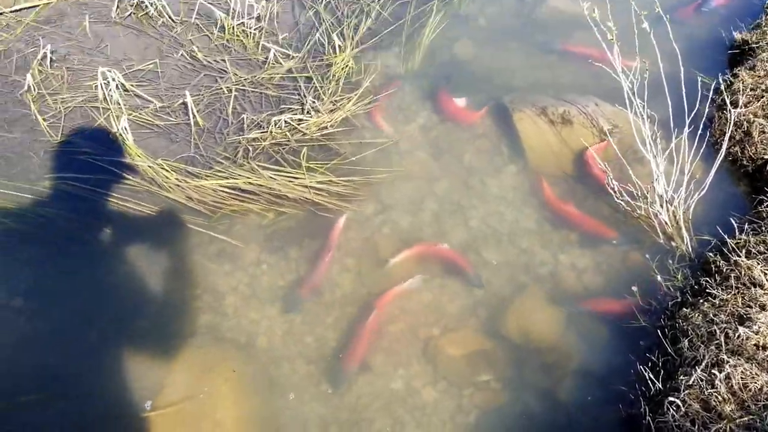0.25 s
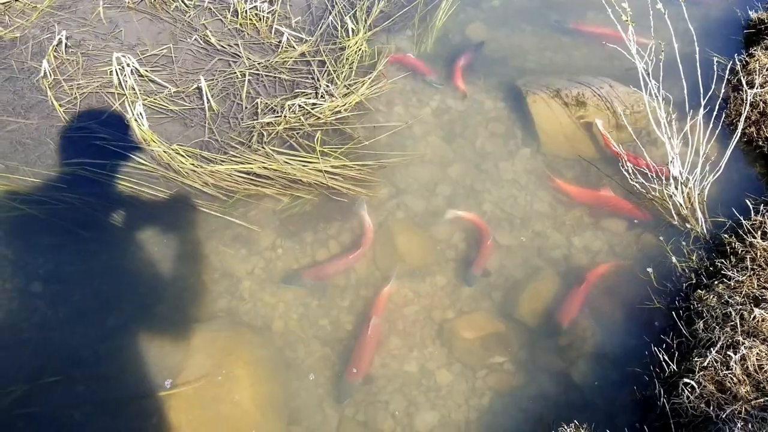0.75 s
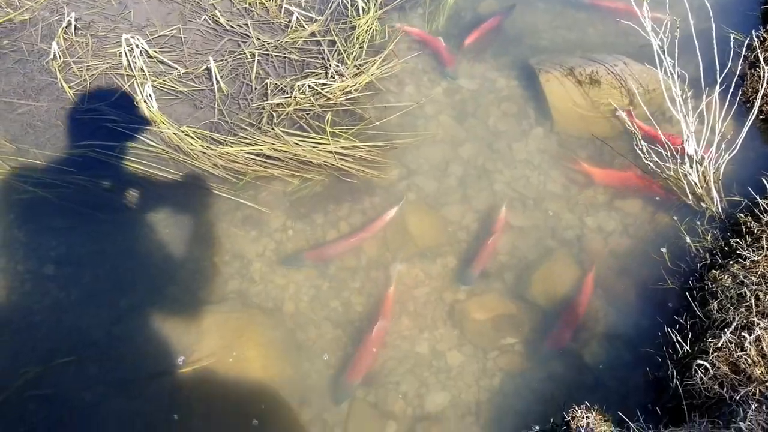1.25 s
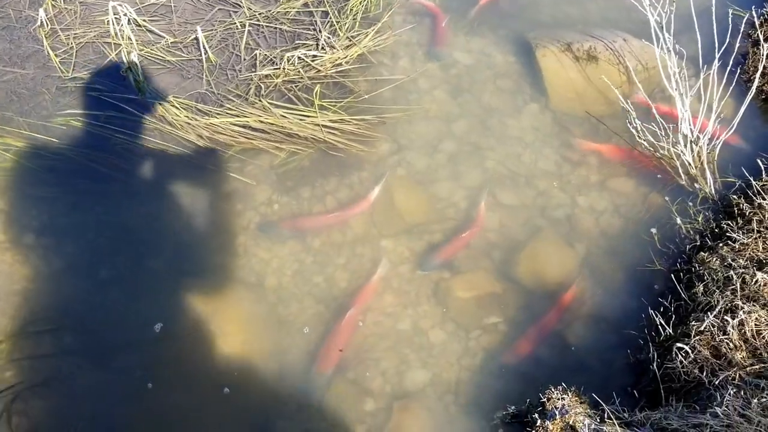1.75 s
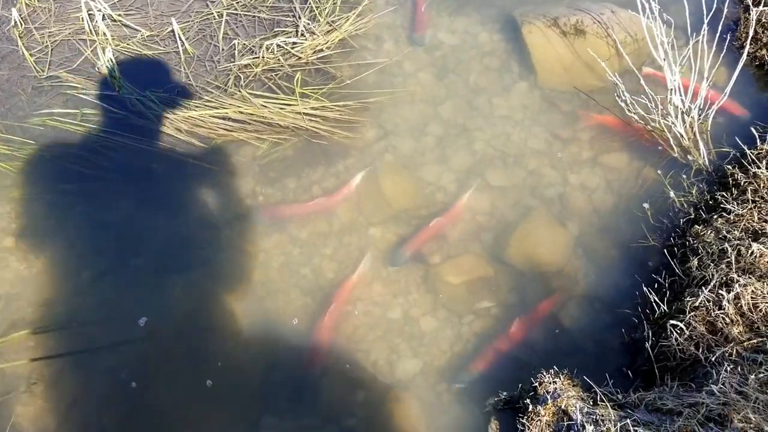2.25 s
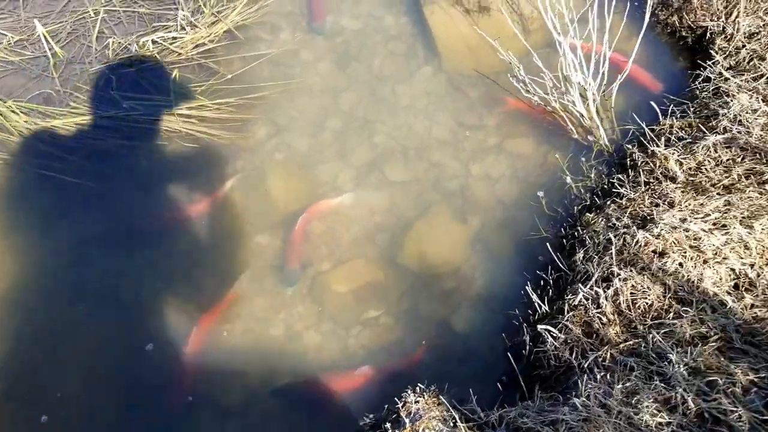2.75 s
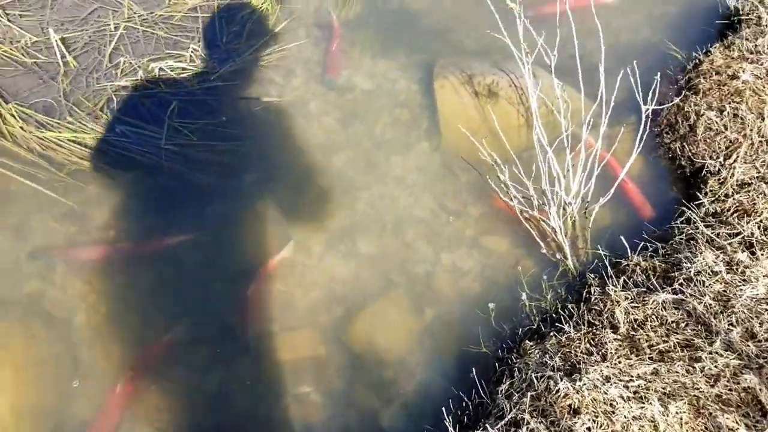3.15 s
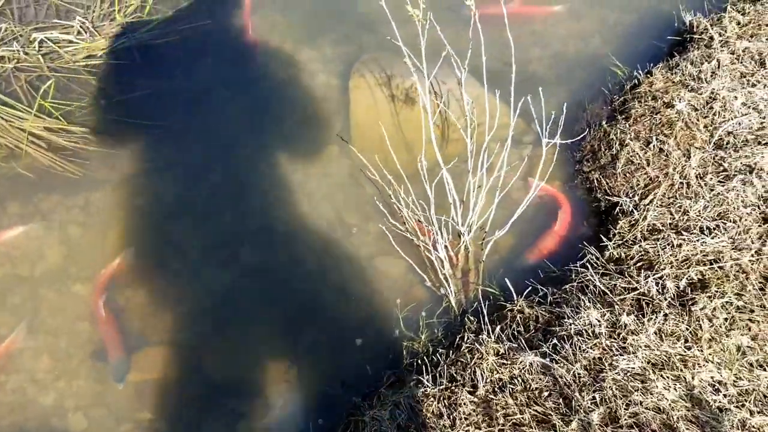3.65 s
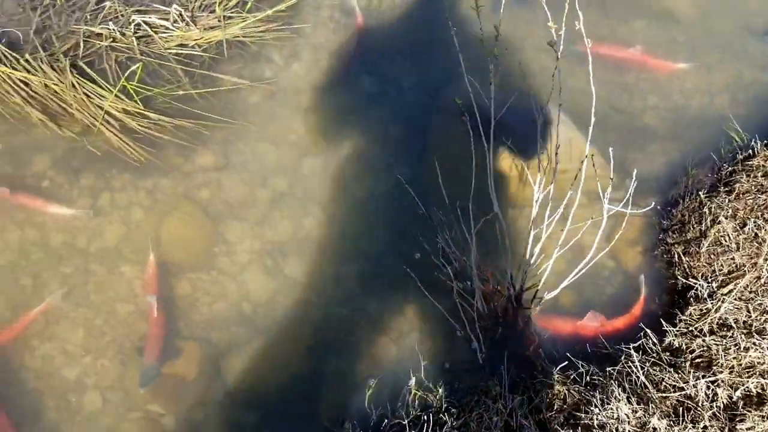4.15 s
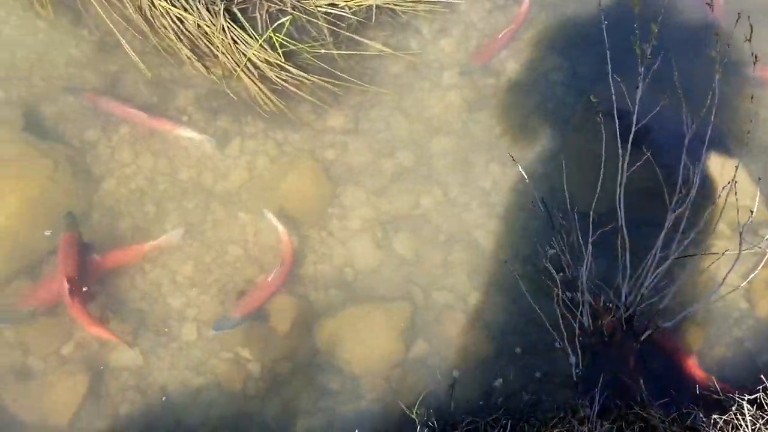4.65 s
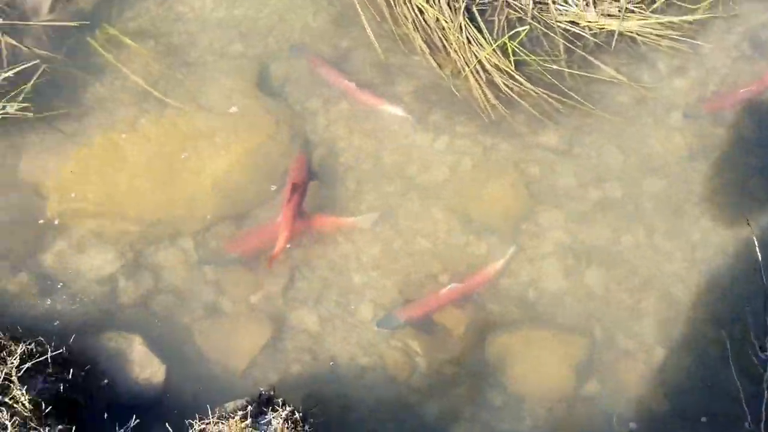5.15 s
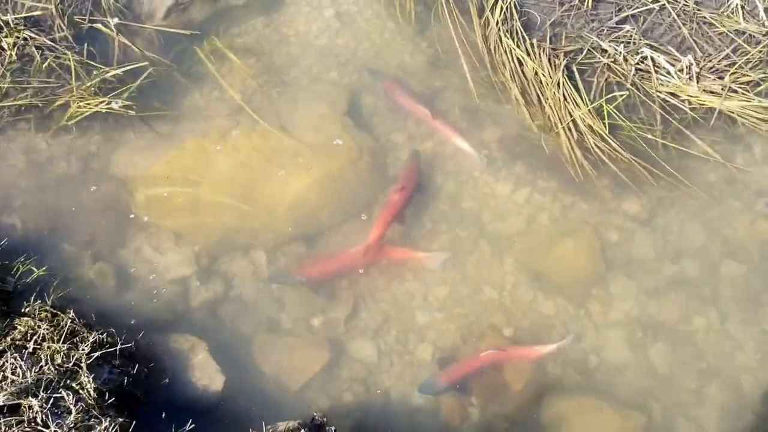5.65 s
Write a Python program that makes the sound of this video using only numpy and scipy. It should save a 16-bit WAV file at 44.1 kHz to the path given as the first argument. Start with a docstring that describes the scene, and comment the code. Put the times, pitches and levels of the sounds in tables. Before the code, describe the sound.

A person moves through dry matted grass beside quiet water that is not heard. A brief faint cloth rustle opens; small crunches and stem snaps follow, then fade. From two and a half to four and a half seconds come strong uneven steps: muffled crunch, low heel thuds, dry creaks and blade swishes. Then near quiet with faint clothing friction. Dry open air, feet close to the handheld microphone.

```python
"""A few steps through dry grass on a stream bank, close to a hand-held phone, after some shifting of the feet.
Blades swish as grains of noise that follow each sweep of a boot; matted turf crunches under load and thuds.
Stalks creak, stems snap and dull knocks sound as rough pushes into short resonances.
A sleeve brushes the microphone ports once and faint rustles come and go: finer grains of cloth-like friction.
Open air adds a faint low rumble and thin hiss; each of the two ports colours the treble in its own way."""
import sys
import numpy as np
from scipy import signal
from scipy.fft import rfft, irfft, next_fast_len
from scipy.io import wavfile
from scipy.ndimage import uniform_filter1d, map_coordinates

SR = 44100
rng = np.random.default_rng(int(sys.argv[2]) if len(sys.argv) > 2 else 0)


def file_out(sig):
    """Save sig as 16-bit WAV at sys.argv[1]."""
    # one column per channel
    cols = np.atleast_2d(sig).T
    # limit, then scale
    lim = np.clip(cols, -1, 1)
    pcm = np.round(lim * 32767).astype(np.int16)
    wavfile.write(sys.argv[1], SR, pcm)


N = 259749
TIME = np.arange(N) / SR  # seconds

# Levels in the tables are those at the source, ahead of any layer gain and of the port colouring.
# Open air at the two ports. Each row: frequency in Hz, left and right relative level in dB.
AIR_SPECTRUM = [(20, -20, -20.5), (43.6, -1.5, -2.5), (73.4, -2.5, 0), (132, -12, -10.5), (206, -20.5, -20),
                (796, -32.5, -30.5), (2200, -31.5, -33), (4080, -30, -37), (4520, -15, -35.5),
                (5550, -36, -41.5), (6580, -47.5, -35.5), (9000, -46.5, -48.5), (13400, -29.5, -29),
                (15500, -39, -33)]
# Jacket cloth on the left and right, before the port colouring. Each row: frequency in Hz, left and right
# relative level in dB.
RUSTLE_SPECTRUM = [(120, -1.5, -17.5), (286, 4.5, 10.5), (696, -3, 1.5), (1130, -8, -3.5),
                   (1600, -1.5, -11), (2170, -4.5, -3.5), (2950, 4, -6), (3930, 1, 2), (4820, -7.5, 1.5),
                   (5860, -4, 5.5), (7550, 0.5, -7.5), (12400, 3.5, 2), (15700, -4, 0.5)]
# Faint rustles: the jacket shifting with the arms, and a faint swish near 2 s. Each row: time of full speed
# in seconds, level in dB, rise, hold and fall in seconds.
RUSTLES = [(0, -59.5, .05, 0.017, .15), (0.217, -74, .15, 0.022, 0.12), (0.86, -73.5, 0.26, .05, .2),
           (2.04, -69.5, 0.13, 0.045, 0.74), (4.867, -63.5, 0.52, 0.019, 0.53),
           (5.14, -60, 0.42, 0.017, 0.22), (5.288, -60.5, 0.19, 0.013, 0.24),
           (5.64, -70.5, 0.29, 0.13, .12)]
# Sleeve cloth at the two ports. Each row: frequency in Hz, left and right relative level in dB.
SLEEVE_SPECTRUM = [(396, -18.5, -17), (990, -25, -16.5), (1530, -29, -16.5), (2020, -11, -1),
                   (2900, -18, -13.5), (3740, -10, -10), (4350, -3.5, -10), (4990, -12, -9),
                   (5700, -28, -5), (6630, -27, -15.5), (7400, -41, -7), (9360, -36, -23.5),
                   (12720, -33.5, -3), (16000, -48, -16.5)]
# The sleeve's one stroke. The row: time of full speed, rise, hold and fall, all in seconds.
SLEEVE_STROKE = (2.75, 0.087, .06, 0.064)
# Colour of the two microphone ports. Each row: frequency in Hz, left and right gain in dB.
PORT_COLOUR = [(3500, -1, -3.5), (4650, 2, -1.5), (4960, -1, -2.5), (5900, -16, -0.5), (7540, -28.5, -2.5),
               (8280, -28, -12.5), (9800, -23, -13), (10370, -14.5, -10), (12480, -14.5, -3.5),
               (15500, -15, -12.5)]
# The heel's weight landing on soft ground. Each row: time in seconds, peak level in dB, pitch in Hz.
HEEL_THUDS = [(1.243, -38, 85.5), (1.531, -44, 74), (2.572, -30.5, 67), (2.618, -31.5, 68),
              (2.801, -44, 68.7), (3.305, -30, 58.5), (3.59, -41.5, 67), (3.911, -38.5, 46),
              (4.035, -39, 47.1), (4.281, -51, 88.5)]
# Dull knocks: tussocks under the sole, and a few faint handling or settling knocks. Each row: time in
# seconds, peak level in dB, pitch in Hz.
DULL_KNOCKS = [(0.025, -37, 213), (0.841, -51.5, 207), (1.101, -31.5, 410), (1.118, -36, 199),
               (1.238, -30.5, 280), (1.261, -30, 200), (1.29, -35, 300), (1.332, -29, 305),
               (1.529, -33, 207), (1.558, -36.5, 600), (1.732, -40.5, 221), (1.902, -41.5, 256),
               (2.079, -46, 380), (2.151, -42.5, 382), (2.435, -34, 400), (2.469, -32, 400),
               (2.493, -24.5, 376), (2.516, -34, 374), (2.555, -28, 350), (2.601, -28.5, 278),
               (2.615, -24.5, 290), (2.776, -18, 350), (2.921, -25, 272), (2.957, -16, 560),
               (2.964, -19, 303), (2.975, -16.5, 308), (2.986, -22.5, 293), (3.063, -23.5, 283),
               (3.107, -22.5, 299), (3.231, -19.5, 390), (3.3, -19.5, 370), (3.418, -20.5, 300),
               (3.537, -18.5, 364), (3.626, -25.5, 423), (3.768, -23.5, 360), (3.891, -28.5, 406),
               (3.946, -27.5, 313), (3.992, -31.5, 247), (4.019, -16, 278), (4.04, -30, 353),
               (4.189, -31.5, 318), (4.273, -21.5, 367), (4.308, -22.5, 310), (4.374, -28, 295),
               (4.506, -29, 480), (4.52, -31, 483), (4.546, -22.5, 274), (4.988, -49, 605),
               (5.262, -49, 353)]
# Bent stalks slipping with a short creak. Each row: time in seconds, peak level in dB, pitch in Hz.
STALK_CREAKS = [(1.066, -30, 1080), (1.078, -29.5, 1420), (1.086, -31, 1440), (1.202, -25.5, 1060),
                (1.737, -34, 1690), (1.857, -39.5, 1030), (1.88, -33, 1730), (1.886, -33.5, 1770),
                (2.04, -43, 1660), (2.156, -46, 1590), (2.18, -46.5, 1640), (2.214, -52, 1630),
                (2.826, -15, 2140), (2.895, -31, 1540), (2.917, -17, 1550), (2.935, -19, 1650),
                (2.965, -12, 1650), (2.975, -15, 1660), (2.985, -13.5, 1690), (2.993, -16.5, 1610),
                (3.055, -24.5, 1450), (3.38, -26, 1560), (3.408, -21.5, 1700), (3.592, -38, 1560),
                (3.638, -31.5, 1600), (3.665, -28.5, 1600), (3.682, -32, 1590), (3.766, -37, 1610),
                (3.791, -34, 2180), (3.905, -34, 1610), (4.263, -17.5, 1810), (4.271, -24, 1770),
                (4.301, -22.5, 1790), (4.315, -21.5, 1820), (4.336, -27.5, 1610), (4.367, -26, 2000),
                (4.453, -34.5, 1700), (4.482, -28, 1680)]
# Rings of a dry stalk. Each row: multiple of its pitch, width in Hz, level in dB.
STALK_RINGS = [(1, 185, -4.5), (1.62, 396, -17.5), (2.5, 1200, -22.5)]
# Dry stems breaking. Each row: time in seconds, peak level in dB, pitch in Hz, length of the tear in seconds.
STEM_SNAPS = [(1.201, -27, 1160, 0.0022), (1.217, -33, 2190, 0.0012), (1.264, -34, 790, 0.0009),
              (1.482, -20, 2550, 0.0003), (1.577, -34.5, 1800, 0.00036), (1.628, -26.5, 3600, 0.00078),
              (1.858, -30, 3450, 0.0016), (1.884, -29, 8000, .001), (1.912, -35, 7000, 0.00081),
              (2.033, -36, 2560, 0.001), (2.56, -23.5, 1020, 0.00035), (2.960, -24.5, 690, 0.00053),
              (3.067, -19, 1180, 0.0015), (3.234, -25.5, 890, 0.00073), (3.407, -19.5, 2670, 0.002),
              (3.633, -38, 690, 0.00075), (3.661, -24.5, 3000, 0.0065), (3.949, -37.5, 790, 0.00044),
              (4.02, -24, 895, 0.0006), (4.302, -25.5, 4300, 0.0025), (4.314, -26, 4240, 0.0051),
              (4.326, -25, 4000, 0.0017), (4.37, -13, 9350, 0.001), (4.384, -19, 3400, 0.0055),
              (4.769, -37, 1930, 0.00093)]
# One thicker twig breaking to the left. The row: time in seconds, peak level in dB.
TWIG_BREAK = (4.3875, -16)
# Rings of that twig. Each row: frequency in Hz, width in Hz, level in dB.
TWIG_RINGS = [(2980, 330, -4), (3900, 410, -1)]
# Crushed turf. Each row: frequency in Hz, relative level in dB.
TURF_SPECTRUM = [(30, -8), (70, -1.5), (160, -4.5), (260, -2), (350, 1.5), (480, -5), (650, -12),
                 (1000, -20.5), (2000, -19.5), (5000, -68)]
# Weight pressing on the matted turf. Each row: time of full load in seconds, level in dB, hold and release
# in seconds.
TURF_PRESSES = [(1.107, -46, 0.15, 0.49), (1.477, -47, 0.026, 0.28), (1.885, -51.5, 0.0074, 0.059),
                (2.082, -58, 0.092, .25), (2.474, -46.5, 0.13, 0.11), (2.709, -32.5, 0.12, 0.14),
                (2.935, -33.5, 0.039, 0.097), (3.053, -36.5, 0.29, 0.34), (3.448, -33.5, 0.071, 0.21),
                (3.798, -44.5, 0.023, 0.24), (4.02, -46, 0.033, 0.074), (4.195, -49.5, 0.024, 0.049),
                (4.287, -38, 0.027, 0.055), (4.385, -41.5, 0.013, 0.061), (4.527, -42.5, 0.033, 0.041),
                (4.595, -56, 0.017, 0.33)]
# Blades rubbing along the boot. Each row: frequency in Hz, relative level in dB.
BLADE_SPECTRUM = [(250, -21), (600, -1), (1000, 2), (1600, 0.5), (2400, 6), (3500, 4), (4800, 3.5),
                  (7000, -5), (14000, -52)]
# Tips of the blades. Each row: frequency in Hz, relative level in dB.
TIP_SPECTRUM = [(2000, -45.5), (4000, -9), (5500, 1), (8000, 4), (12000, 4.5), (16000, 7.5)]
# A boot sweeping through the blades. Each row: time of full speed in seconds, level in dB, treble relative
# to it in dB, rise, hold and fall in seconds.
BOOT_SWEEPS = [(1.064, -39.5, -4, 0.11, .025, 0.07), (1.125, -45.5, -9, 0.091, .04, 0.4),
               (1.432, -51.5, 1, 0.088, 0.16, 0.12), (1.656, -48, 2.5, 0.051, 0.022, 0.16),
               (1.838, -63, 4, 0.18, 0.048, 0.21), (2.47, -54, -6, 0.11, 0.11, .1),
               (2.709, -37.5, -6.5, 0.14, 0.11, 0.27), (3.055, -36, -3, .1, 0.033, 0.32),
               (3.17, -41.5, -13.5, .15, .15, 0.39), (3.487, -32, -4, 0.14, 0.061, 0.051),
               (3.741, -47.5, -4, 0.18, 0.093, 0.45), (4.075, -61, -5.5, 0.13, 0.14, .2),
               (4.295, -46.5, -8.5, 0.13, 0.04, 0.34), (4.522, -38.5, -7, 0.1, 0.031, 0.045),
               (4.623, -54.5, -5, .1, 0.065, 0.085)]

TIP_POWER = 1.18  # the hiss of the tips grows faster with speed than the scrape does
LOAD_S = 0.098  # seconds in which the load on the turf gains its last 20 dB
PORT_LAG_S = .00005  # seconds by which the left port hears the steps later
TOP_HZ = 15900  # upper limit of the phone


def undb(db):
    """Decibels to gain."""
    return 10 ** (np.asarray(db) / 20)


def unit(x):
    """Scale to an rms of 1."""
    return x / np.sqrt(np.mean(x ** 2))


def colour(x, points, size=4096):
    """Minimum-phase, hence causal, filter from (Hz, dB) or (Hz, left dB, right dB) points."""
    hz, *sides = np.transpose(points)
    log_hz = np.log(np.maximum(np.fft.rfftfreq(size, 1 / SR), 1))
    gains = undb([np.interp(log_hz, np.log(hz), db) for db in sides])
    # folding the cepstrum onto positive time makes the response causal
    cepstrum = irfft(np.log(gains))
    cepstrum[:, 1:size // 2] *= 2
    cepstrum[:, size // 2 + 1:] = 0
    response = irfft(np.exp(rfft(cepstrum)))
    return signal.fftconvolve(x, response, axes=1)[:, :N]


def resonate(x, hz, width_hz):
    """One resonance, gain 1 at its centre."""
    return signal.lfilter(*signal.iirpeak(hz, hz / width_hz, fs=SR), x)


def walk(rate):
    """Smooth random wander with an rms of 1, taking `rate` new values a second."""
    k = int(SR / rate)
    steps = np.repeat(rng.standard_normal(N // k + 1), k)
    return unit(uniform_filter1d(steps, k)[:N])


def stereo(mid, side, side_db, pan_db=0):
    """Left and right from a shared part and an opposed part; a positive pan leans left."""
    side = side * undb(side_db)
    left = (mid + side) * undb(pan_db / 2)
    right = (mid - side) * undb(-pan_db / 2)
    return np.array([left, right])


def grains(rate, spread_db, length_s, cap=5.1):
    """Two rows of noise under shared tiny fractures; a positive spread makes a few strong, a negative a few weak."""
    happens = rng.random(N) < rate / SR
    sizes = undb(spread_db * np.minimum(rng.exponential(size=N), cap)) * happens
    power = signal.lfilter([1], [1, -np.exp(-1 / (length_s * SR))], sizes ** 2)
    return unit(np.sqrt(power) * rng.standard_normal((2, N)))


def contact(length_s, tail_db, tail_s, size=6000):
    """A short rough push, with a weaker trail of settling fibres; two unrelated rows."""
    t = TIME[:size]
    envelope = np.exp(-t / length_s) + undb(tail_db) * np.exp(-t / tail_s)
    return rng.standard_normal((2, size)) * envelope


def add(out, s, db, sound):
    """Mix a two-channel sound in from time s, its middle peaking at db."""
    i = max(int(s * SR), 0)
    middle_peak = np.abs(sound.mean(axis=0)).max()
    out[:, i:i + sound.shape[1]] += (sound * undb(db) / middle_peak)[:, :N - i]


def swell(s, rise_s, hold_s, fall_s):
    """One movement: it gains 20 dB in rise_s up to time s, holds, then loses 20 dB every fall_s."""
    early, late = np.maximum(s - TIME, 0), np.maximum(TIME - s - hold_s, 0)
    return undb(-20 * (early / rise_s + late / fall_s))


def together(gains):
    """Overlapping movements add in power."""
    return np.sqrt(sum(gain ** 2 for gain in gains))


def patchy(x, patchy_db=2.5, rate=55, count=9):
    """Ever different blades are touched, so each band swells and fades on its own."""
    edges = np.r_[0, np.geomspace(1000, 7000, count), SR]  # Hz
    size = next_fast_len(N, real=True)
    hz, spectrum = np.fft.rfftfreq(size, 1 / SR), rfft(x, size)
    out = np.zeros((2, N))
    for low, high in zip(edges, edges[1:]):
        band = irfft(spectrum * ((hz >= low) & (hz < high)), size)[:, :N]
        out += band * undb(patchy_db * walk(rate))
    return out


def ports(x):
    """The left port lies a little farther from the feet, so it hears them PORT_LAG_S later."""
    left = map_coordinates(x[0], [(TIME - PORT_LAG_S) * SR])
    return np.array([left, x[1]])


def air(db=-59.5, rumble_hz=60, width_hz=90):
    """A faint rumble, much alike at both ports, under a steady thin hiss that is not."""
    rumble = resonate(stereo(*rng.standard_normal((2, N)), side_db=-8), rumble_hz, width_hz)
    noise = rng.standard_normal((2, N))
    hiss = noise - resonate(noise, rumble_hz, width_hz)  # leaves room for the rumble
    return undb(db) * unit(colour(rumble + hiss, AIR_SPECTRUM))


def rustles(db=11.0):
    """Faint rustles, mostly jacket cloth shifting with the arms: dense small friction grains."""
    cloth = unit(colour(grains(rate=5700, spread_db=2.5, length_s=0.00092), RUSTLE_SPECTRUM))
    speed = together(undb(level_db) * swell(s, *shape) for s, level_db, *shape in RUSTLES)
    return cloth * undb(db) * speed


def sleeve(db=-22.0):
    """Cloth slides right over the ports: fine, bright friction, different at each."""
    cloth = unit(colour(grains(rate=7100, spread_db=0.0, length_s=0.00027), SLEEVE_SPECTRUM))
    return cloth * undb(db) * swell(*SLEEVE_STROKE)


def thuds(width_hz=40, lead_s=0.0073):
    """Soft ground answers the heel with a few slow swings, begun lead_s ahead of the listed time."""
    out = np.zeros((2, N))
    for s, peak_db, hz in HEEL_THUDS:
        push = stereo(*contact(length_s=0.045, tail_db=-15, tail_s=0.023), side_db=-7.5, pan_db=2.5)
        swing = resonate(resonate(push, hz, width_hz), hz, 2 * width_hz)
        add(out, s - lead_s, peak_db, swing)
    return out


def knocks(width_hz=280, soft_hz=550, offset_s=0.002525, band_hz=(170, 850), rough_db=-14):
    """Mostly a tussock collapsing: a dull knock a few cycles long, offset_s after its listed time."""
    out = np.zeros((2, N))
    damping = signal.butter(2, band_hz, "bandpass", fs=SR)
    for s, peak_db, hz in DULL_KNOCKS:
        push = undb(rough_db) * contact(length_s=0.0021, tail_db=-13.5, tail_s=0.012)
        push[0, 0] += 2  # one sharp push
        push = stereo(*push, side_db=-14.5, pan_db=-4.5)
        body = resonate(resonate(push, hz, width_hz), hz, soft_hz)
        add(out, s + offset_s, peak_db, signal.lfilter(*damping, body))
    return out


def stalk(slip, hz, skirt_hz=1500):
    """The short ring of a dry stalk: three broad resonances, narrowed around its pitch."""
    ring = sum(undb(db) * resonate(slip, hz * ratio, width_hz) for ratio, width_hz, db in STALK_RINGS)
    return resonate(ring, hz, skirt_hz)


def creaks():
    """A stalk slips under load and rings for a few milliseconds."""
    out = np.zeros((2, N))
    for s, peak_db, hz in STALK_CREAKS:
        slip = stereo(*contact(length_s=0.0027, tail_db=-4.0, tail_s=0.0058), side_db=-6.0, pan_db=-10.0)
        add(out, s, peak_db, stalk(slip, hz))
    return out


def snaps(tear_db=3.5):
    """A stem breaks: one sharp crack and a short tear in a resonance as wide as its pitch."""
    out = np.zeros((2, N))
    for s, peak_db, hz, length_s in STEM_SNAPS:
        tear = undb(tear_db) * contact(length_s, tail_db=-21, tail_s=0.0058)
        tear[0, 0] += 2  # the first fibre gives way at once
        crack = stereo(*tear, side_db=-3.5, pan_db=1.5)
        width_hz = min(hz, SR / 4)
        add(out, s, peak_db, resonate(resonate(crack, hz, width_hz), hz, width_hz))
    return out


def twig(pan_db=12, skirt_hz=2500):
    """A thicker twig cracks underfoot, to the left, and rings briefly at two pitches."""
    out = np.zeros((2, N))
    crack = stereo(*contact(length_s=0.002, tail_db=-22, tail_s=.004), side_db=-3, pan_db=pan_db)
    ring = np.zeros_like(crack)
    for hz, width_hz, db in TWIG_RINGS:
        ring += undb(db) * resonate(resonate(crack, hz, width_hz), hz, skirt_hz)
    add(out, *TWIG_BREAK, ring)
    return out


def turf(crunch_db=2.5, ticks_db=-9.0, tick_hz=1620, uneven_db=2.5):
    """Matted grass compresses in muffled crunches, much alike at both ports; small stalks tick in it."""
    weight = together(undb(db) * swell(s, LOAD_S, hold_s, release_s) for s, db, hold_s, release_s in TURF_PRESSES)
    weight = weight * undb(uneven_db * walk(70))  # the mat gives way in fits
    crushing = stereo(*grains(rate=400, spread_db=2.0, length_s=0.0014), side_db=-20.0, pan_db=-4.5)
    crunch = unit(colour(crushing, TURF_SPECTRUM))
    slips = stereo(*grains(rate=100, spread_db=0.5, length_s=0.00072), side_db=2.0, pan_db=-1.5)
    ticks = unit(stalk(slips, tick_hz))
    return weight * (undb(crunch_db) * crunch + undb(ticks_db) * ticks)


def swish(body_db=4.5, tips_db=11.0, crackle_db=-8.0, flutter_db=1.5):
    """Blades scrape the boots in dense tiny slips, a few crackle; their tips hiss when the foot swings fast."""
    sweeps = [(swell(s, *shape), db, treble_db) for s, db, treble_db, *shape in BOOT_SWEEPS]
    body = together(undb(db) * speed for speed, db, _ in sweeps)
    tips = together(undb(db + treble_db) * speed ** TIP_POWER for speed, db, treble_db in sweeps)
    crackle = undb(crackle_db) * grains(rate=130, spread_db=4.0, length_s=0.00061)
    slips = grains(rate=2200, spread_db=-2.5, length_s=0.0028) + crackle
    scrape = unit(colour(patchy(stereo(*slips, side_db=-7)), BLADE_SPECTRUM))
    tip_slips = grains(rate=7400, spread_db=-4.5, length_s=0.00078) + crackle
    hiss = unit(colour(tip_slips, TIP_SPECTRUM))
    flutter = undb(flutter_db * walk(50))
    return (undb(body_db) * body * scrape + undb(tips_db) * tips * hiss) * flutter


def scene():
    """Steps and rustles reach the phone through its coloured ports; sleeve and air carry their own port spectra."""
    steps = thuds() + knocks() + creaks() + snaps() + twig() + turf() + swish()
    return air() + sleeve() + colour(rustles() + ports(steps), PORT_COLOUR)


def record(dry):
    """The phone cuts the top with a steep low-pass."""
    low_pass = signal.ellip(10, .2, 80, TOP_HZ, fs=SR, output="sos")  # 0.2 dB ripple, 80 dB rejection
    return signal.sosfilt(low_pass, dry)


dry = scene()
out = record(dry)
file_out(out)
```